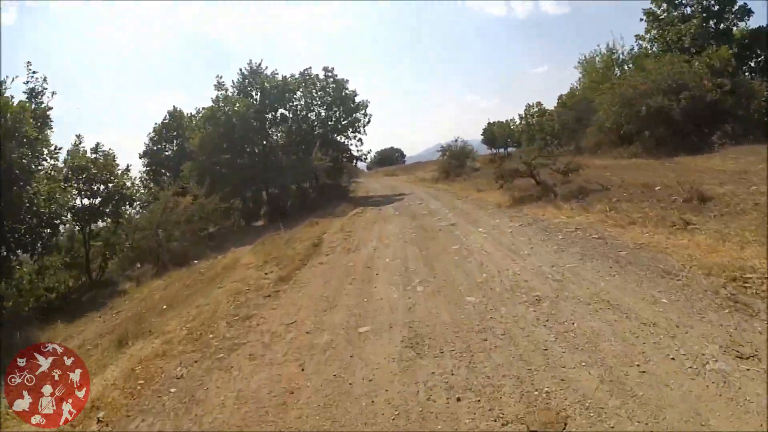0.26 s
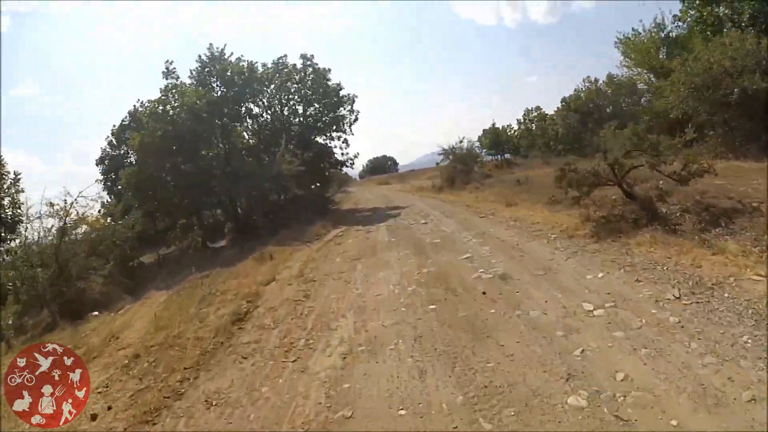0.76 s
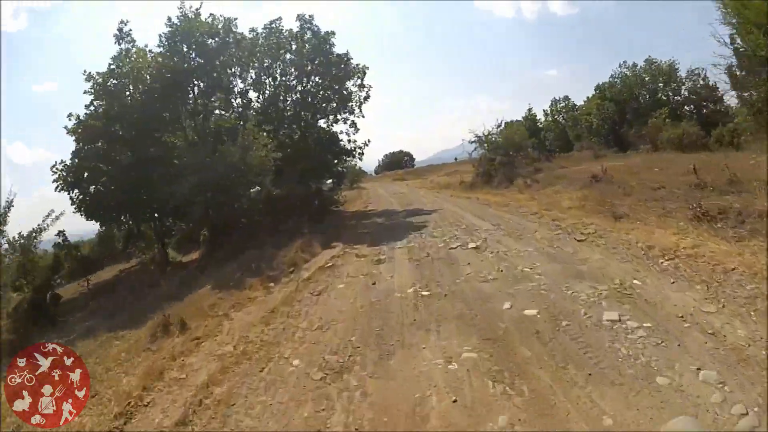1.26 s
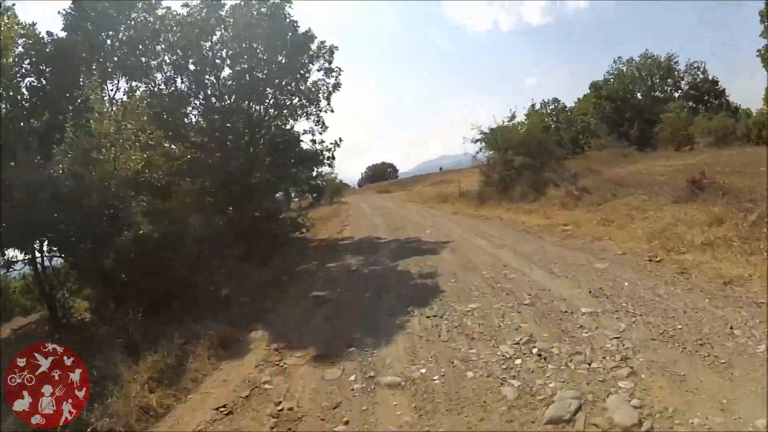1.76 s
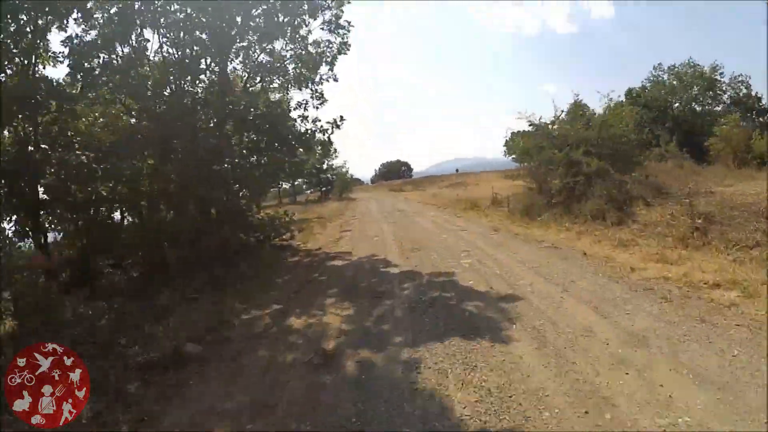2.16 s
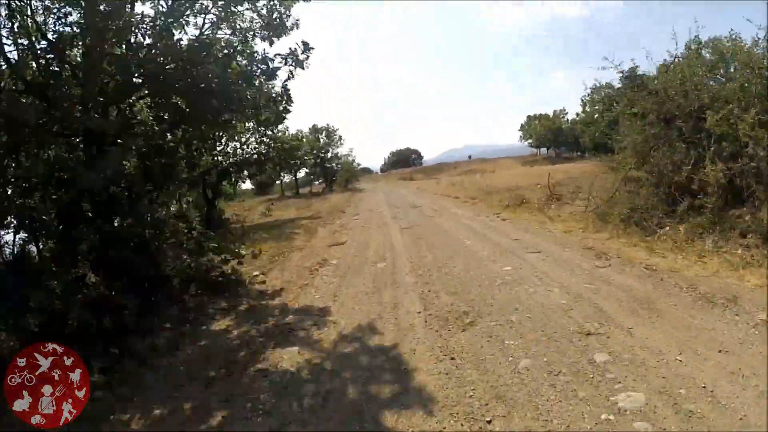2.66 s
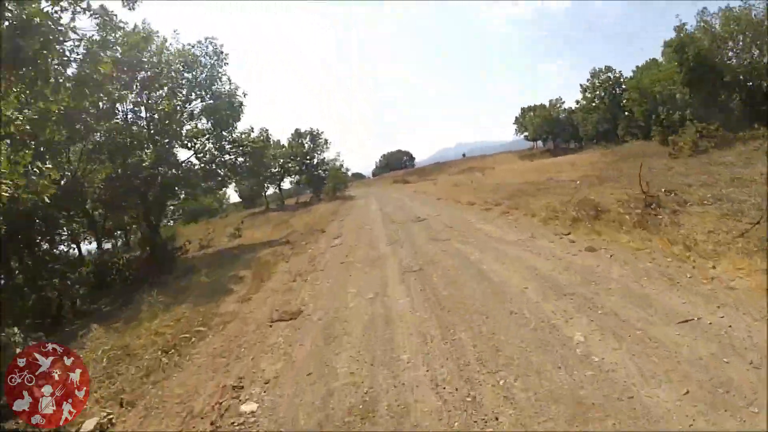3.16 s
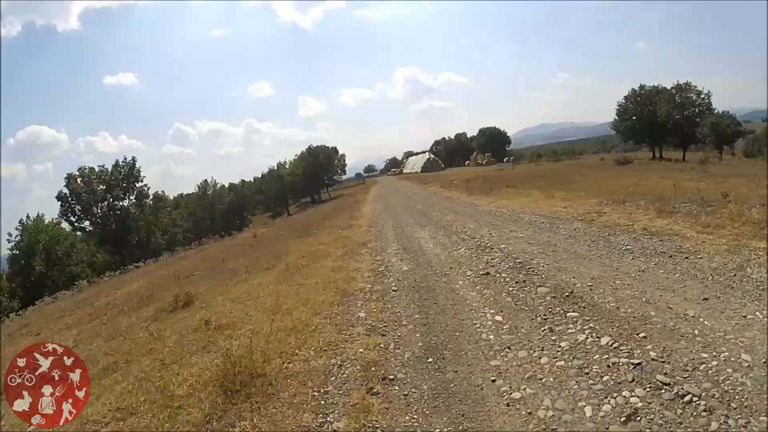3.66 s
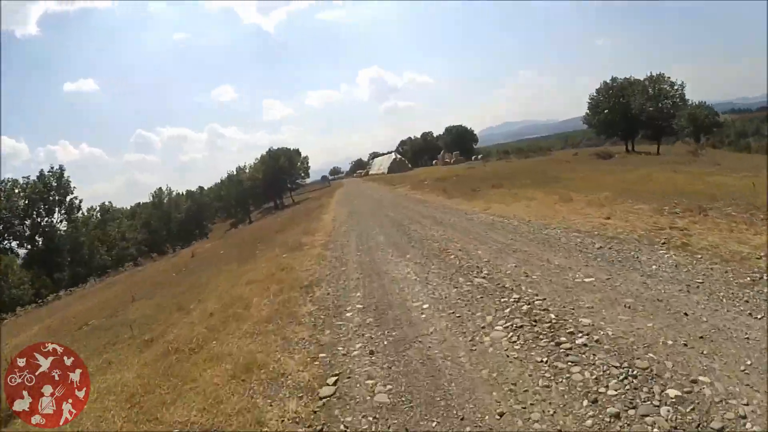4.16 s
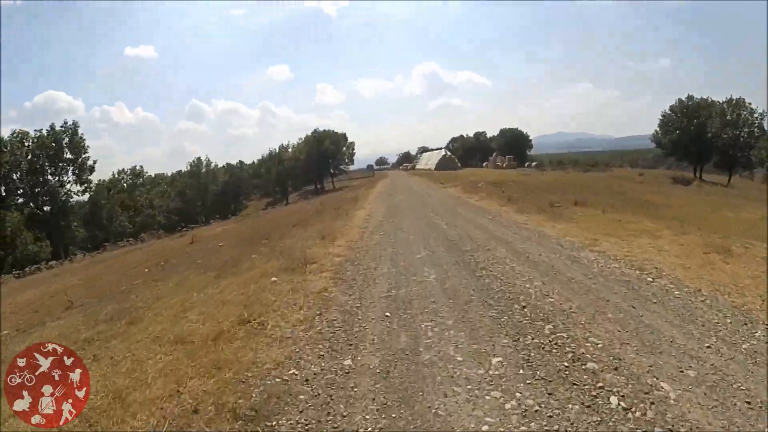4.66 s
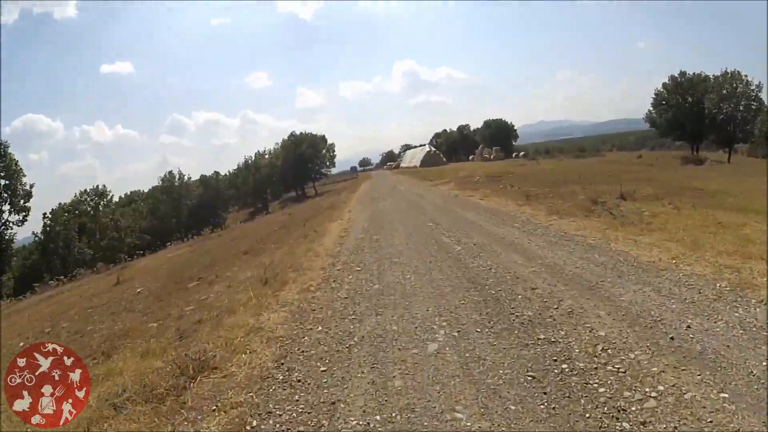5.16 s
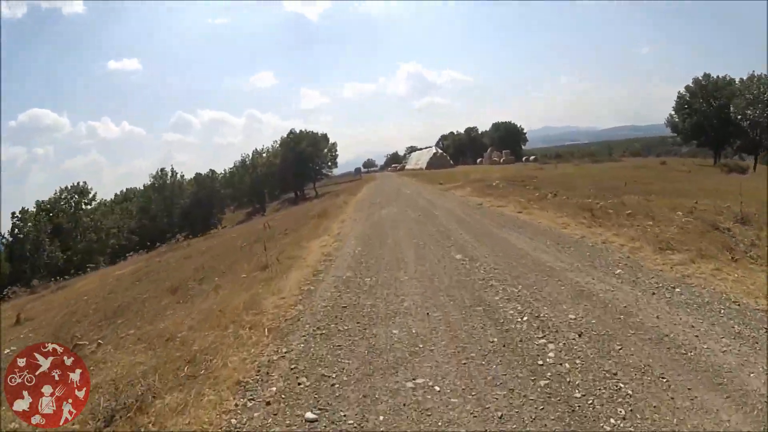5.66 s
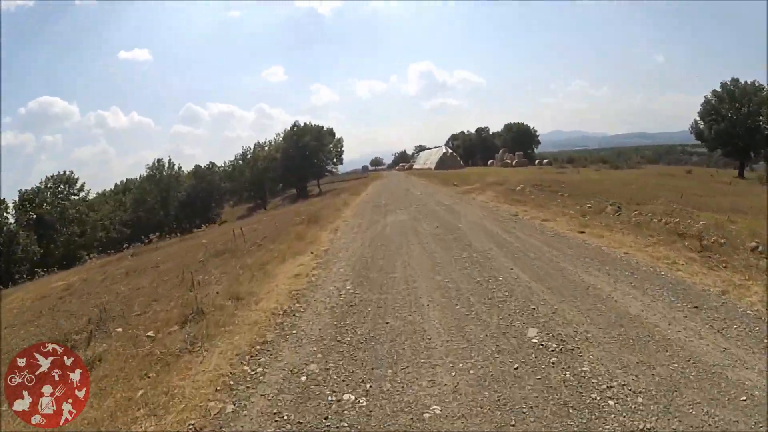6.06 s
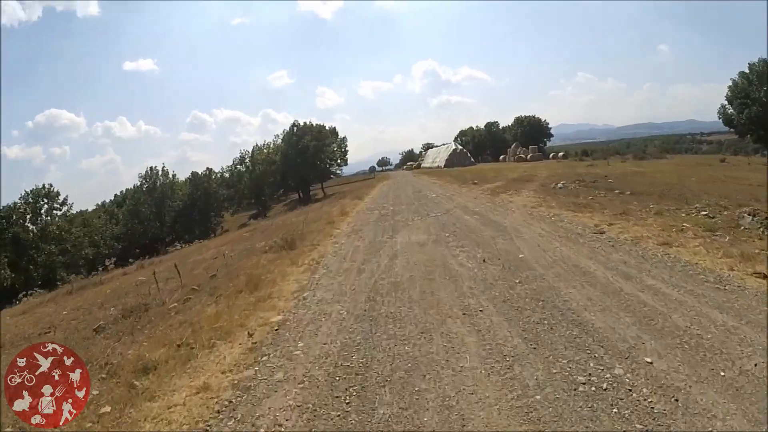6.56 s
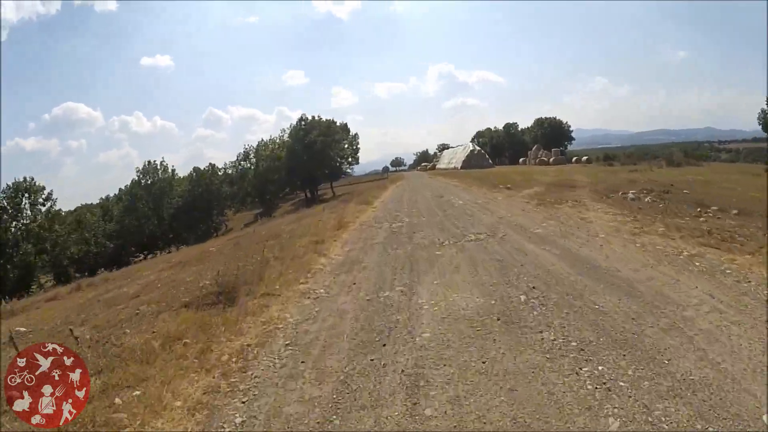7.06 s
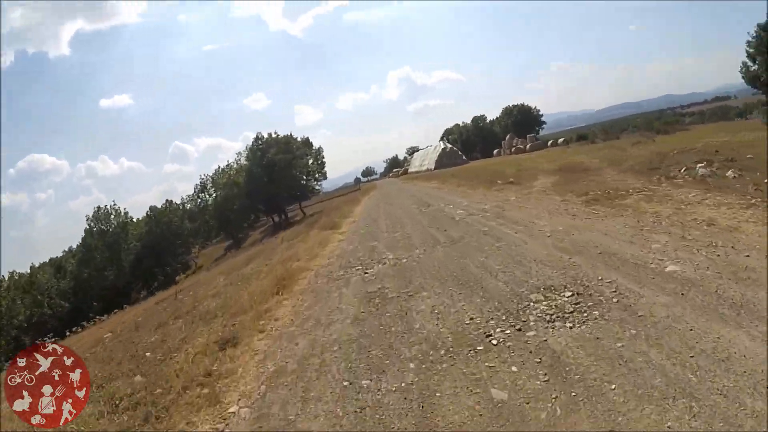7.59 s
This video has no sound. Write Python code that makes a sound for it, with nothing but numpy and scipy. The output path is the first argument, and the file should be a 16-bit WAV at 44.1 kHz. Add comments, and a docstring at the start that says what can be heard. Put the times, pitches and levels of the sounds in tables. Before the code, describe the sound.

Continuous gritty gravel crunch with quick bright ticking, deep wind buffeting, dull bump knocks and thumps, and a few sharp stone strikes.

```python
"""Mountain bike on a gravel road

Heard from a microphone that rides on the bike. Tyres crunch, as many briefly ringing pebbles over grit.
Stones pop as bursts of coloured noise, or strike the bike, whose frame answers with damped modes.
Bumps knock the frame, thump the tyres, sway the mount at its resonance and make a loose part tick.
Wind rumbles and breaks into eddies, both as coloured noise, and the largest swings saturate.
"""
import sys
import numpy as np
from scipy import signal
from scipy.fft import rfft, irfft
from scipy.io import wavfile
from scipy.ndimage import uniform_filter1d

SR = 44100
rng = np.random.default_rng(int(sys.argv[2]) if len(sys.argv) > 2 else 0)


def file_out(sig):
    """Save sig as 16-bit WAV at sys.argv[1]."""
    # one column per channel
    cols = np.atleast_2d(sig).T
    # limit, then scale
    lim = np.clip(cols, -1, 1)
    pcm = np.round(lim * 32767).astype(np.int16)
    wavfile.write(sys.argv[1], SR, pcm)


N = 345303
T = np.arange(N) / SR
RING = T[:2048]  # time axis of one short blow, s


def undb(db):
    """Logarithmic level: decibels to amplitude gain."""
    return np.exp(np.asarray(db) * (np.log(10) / 20))


def unit(x):
    """Normalization: scale to rms 1."""
    return x / np.sqrt(np.mean(x ** 2))


def steady(x, seconds):
    """Automatic level: hold the running rms near 1, keeping the faster flutter."""
    size = int(seconds * SR / 2) + 1
    power = uniform_filter1d(uniform_filter1d(x ** 2, size), size)
    return x / np.sqrt(power + 1e-12)


def walk(rate):
    """Smoothed random steps, rate per second: a wander with a spread near 1."""
    size = int(SR / rate)
    held = np.repeat(rng.standard_normal(N // size + 1), size)
    return unit(uniform_filter1d(held, size)[:N])


def colour(x, spectrum, size=2048):
    """Minimum-phase filtering: a causal response through (Hz, dB) points, found by folding the cepstrum."""
    hz, db = np.transpose(spectrum)
    bins = np.maximum(np.fft.rfftfreq(size, 1 / SR), 1)
    gain_db = np.interp(np.log(bins), np.log(hz), db)
    cepstrum = irfft(np.log(undb(gain_db)))
    cepstrum[1:size // 2] *= 2
    cepstrum[size // 2 + 1:] = 0
    response = irfft(np.exp(rfft(cepstrum)))
    return signal.oaconvolve(x, response)[:len(x)]


def ring(modes, scatter_db, detune=0):
    """Modal decay: a blow excites damped sines, each time weighted and tuned a little differently."""
    luck = rng.standard_normal((len(modes), 2))
    total = 0
    for (hz, width, db), (strength, bend) in zip(modes, luck):
        decay = np.exp(-np.pi * width * RING)
        tone = np.sin(2 * np.pi * hz * (1 + detune * bend) * RING)
        total = total + undb(db + scatter_db * strength) * decay * tone
    return total


def scrape(rise_s, decay_s):
    """Noise burst: noise that swells and dies in milliseconds."""
    swell = 1 - np.exp(-(RING / rise_s) ** 2)
    return rng.standard_normal(len(RING)) * swell * np.exp(-RING / decay_s)


def peak(x, db):
    """Short-time level: scale a blow by the rms of its loudest millisecond, read as a sine's amplitude."""
    return x * undb(db) / np.sqrt(2 * uniform_filter1d(x ** 2, size=44).max())


def add(out, s, x):
    """Superposition: mix a blow in at time s."""
    start = int(np.clip(s * SR, 0, N - 1))
    out[start:start + len(x)] += x[:N - start]


def grains(rate, spread_db):
    """Random impulse train, rate per second: many small impulses, a few large, normalized to rms 1."""
    out = np.zeros(N)
    hits = np.flatnonzero(rng.random(N) < rate / SR)
    size = rng.exponential(size=N)[hits]
    sign = np.sign(rng.random(N)[hits] - .5)
    out[hits] = sign * undb(spread_db * np.minimum(size, 4.5))
    return unit(out)


# level of gravel under the tyres: start_s, level_db [dB]
CRUNCH_LEVEL = [(0, -39.5), (1.35, -36), (1.58, -41.5), (1.8, -36), (2.4, -35), (3.6, -38), (4.1, -35.5),
                (5.9, -33.5), (6.65, -33.5), (7.45, -36), (7.83, -35.5)]
# colour of the gravel: pitch_hz [Hz], relative level_db [dB]
CRUNCH_SPECTRUM = [(200, 10.5), (600, 0.5), (1000, 4.5), (1350, 2.5), (1750, -2), (2400, -1), (3300, -6),
                   (4200, -7), (5200, -15.5), (6500, -22), (10000, -49), (15000, -46)]


def tyres(crunch_db):
    """Granular excitation: pebbles ground under the tread each ring at their own pitch, over fine grit."""
    pebbles = 0
    for hz in np.geomspace(600, 12000, num=14):
        width_hz = 0.19 * hz
        pebble = ring([(hz, width_hz, 0)], 0)
        ringing = unit(signal.oaconvolve(grains(600, 4.5), pebble)[:N])
        pebbles = pebbles + np.sqrt(width_hz) * ringing
    grit = unit(pebbles) + undb(-8.0) * grains(3500, 6.0)
    # stones give way in little clumps
    clumps = undb(2.1 * walk(170) + 1.6 * walk(30))
    return steady(colour(grit * clumps, CRUNCH_SPECTRUM), 0.9) * undb(crunch_db)


# loudest stones popping out from under the tyres: start_s, level_db [peak dB], pitch_hz, fade_ms
POPS = [(0.926, -22.5, 2300, 3), (1.155, -20, 1970, 2.8), (1.746, -20.5, 2050, 7),
        (1.784, -19.5, 2140, 3.6), (1.925, -17.5, 1910, 6), (2.071, -15.5, 1780, 2.7),
        (2.238, -18, 1900, 3.6), (2.259, -19.5, 2400, 2.4), (2.273, -27, 2100, 2.1), (2.3548, -13, 2050, 3),
        (2.676, -14, 1290, 3), (3.1175, -21.5, 2130, 3), (3.319, -16, 1860, 3.3), (3.402, -12, 1070, 1.8),
        (3.843, -20, 1910, 5.2), (3.977, -18.5, 1810, 3.7), (4.19, -24.5, 2000, 8.8),
        (4.461, -18.5, 1940, 3.7), (4.8505, -23, 2170, 6.8), (5.193, -23, 1660, 5), (5.43, -22, 2280, 3.8),
        (5.623, -22, 2200, 4.5), (5.871, -17, 1070, 5.6), (5.986, -29, 2300, 4.5),
        (6.355, -21.5, 1995, 3.5), (6.503, -26, 2000, 3), (6.512, -19.5, 2040, 3), (7.05, -19, 2160, 3.8),
        (7.554, -25, 2000, 3), (7.607, -19.5, 1580, 3.6)]
# colour of a pop: multiple of its pitch [ratio], relative level_db [dB]
POP_BAND = [(.25, -23), (.4, -3), (1, 2.5), (1.3, -0.5), (1.65, -16.5), (6, -45)]


def pops():
    """Band-limited transients: a pinched stone escapes with a short gritty burst."""
    out = np.zeros(N)
    for s, db, hz, fade_ms in POPS:
        band = [(hz * multiple, band_db) for multiple, band_db in POP_BAND]
        burst = scrape(rise_s=0.00049, decay_s=fade_ms / 1000)
        add(out, s, peak(colour(burst, band), db))
    return out


# dull knocks of the frame over bumps, and at 3.075 s a thud as a squall sets in: start_s, level_db [peak dB]
KNOCKS = [(0.055, -20), (0.862, -3.5), (1.451, 1.5), (1.4957, -5), (1.842, -0.5), (1.888, -1), (2.074, -11),
          (2.255, -9), (2.677, -14), (2.886, -6), (2.946, -18), (2.965, -7.5), (3.012, -6), (3.075, -9.5),
          (3.402, -6), (3.4218, -9), (3.444, -3), (3.965, -11), (6.754, -28), (6.813, -16)]
# ring of the frame: pitch_hz, width_hz, relative level_db [dB]
FRAME_MODES = [(373, 88, -2), (590, 65, 1), (780, 74, -3), (920, 105, -0.5), (1160, 67, -11)]
KNOCK_GRIT_DB = -12.5  # stones grinding during a knock, against the knock


def frame_knocks():
    """Struck structure: a short push convolved with the frame's modes rings low, while stones grind."""
    out = np.zeros(N)
    push = RING * np.exp(-RING / 0.00017)
    for s, db in KNOCKS:
        knock = signal.fftconvolve(ring(FRAME_MODES, 3.3, detune=0.03), push)
        grinding = signal.fftconvolve(knock, scrape(.001, .003))
        add(out, s, peak(knock, db))
        add(out, s, peak(grinding, db + KNOCK_GRIT_DB))
    return out


# soft thumps of the tyres over bumps: start_s, level_db [peak dB], pitch_hz
THUMPS = [(2.196, -6, 189), (2.32, -8, 230), (3.102, -10, 210), (3.202, 0.5, 258), (3.251, 6, 240),
          (3.315, -3, 300), (3.388, -11, 280), (6.738, -4, 140), (7.014, -1, 172), (7.146, -11, 170),
          (7.412, -15, 260), (7.583, -4, 200), (7.716, -6, 280)]
THUMP_DAMPING, THUMP_CONTACT_S = 0.56, 0.0009  # resonance width over pitch; time scale of the push


def tyre_thumps():
    """Heavily damped resonance: a soft push makes the tyre thump at one low pitch."""
    out = np.zeros(N)
    soft_push = RING * np.exp(-RING / THUMP_CONTACT_S)
    for s, db, hz in THUMPS:
        resonance = ring([(hz, THUMP_DAMPING * hz, 0)], 0)
        add(out, s, peak(signal.fftconvolve(resonance, soft_push), db))
    return out


# flung stones that strike the bike, and at 3.436 s a broad click: start_s, reference level_db [dB], thud_db
# [dB, relative]
CLACKS = [(3.432, -21.5, -9), (3.436, -17, -4), (3.4561, -10, -11), (5.4907, -4, -1.5), (5.666, -9, -1),
          (5.836, -7.5, 0), (5.9639, -11.5, 1)]
# colour of a flung stone's snap: pitch_hz, relative level_db [dB]
CLACK_SPECTRUM = [(200, -14), (660, 7), (1100, 5.5), (1600, -3), (2000, 1), (3000, -4), (4200, 4),
                  (5600, -2), (6800, -7), (8300, -5.5), (10600, -15), (12400, -14.5), (15000, -19.5)]
SNAP_DB, CLACK_GRIT_DB, CLACK_THUD_DB = 3.5, -4, -2.5  # snap, grit and thud, each against the row's level
CLACK_LEAD_S, CLACK_RISE_S, CLACK_DECAY_S = 0.000983, 0.0013, 0.0024  # lead of the grit; its swell and fade


def flung_stones():
    """Impact and response: an impulsive snap amid a gritty burst, answered by the frame's modes."""
    out = np.zeros(N)
    snap = colour(signal.unit_impulse(len(RING)), CLACK_SPECTRUM)
    for s, db, thud_db in CLACKS:
        grit = colour(scrape(CLACK_RISE_S, CLACK_DECAY_S), CLACK_SPECTRUM)
        add(out, s, peak(snap, db + SNAP_DB))
        add(out, s - CLACK_LEAD_S, peak(grit, db + CLACK_GRIT_DB))
        add(out, s, peak(ring(FRAME_MODES, 2), db + CLACK_THUD_DB + thud_db))
    return out


# hardest ticks of a loose part, jolted by the road, the first a click at the very start: start_s, level_db
# [peak dB]
JOLTS = [(0.007, -20.5), (0.044, -23.5), (0.0948, -20), (0.2505, -24), (0.29, -24), (0.341, -22),
         (0.358, -15.5), (0.399, -24), (0.4495, -17), (0.466, -27), (0.473, -18.5), (0.49, -25),
         (0.5338, -27), (0.5542, -19.5), (0.618, -20.5), (0.6547, -17), (0.6927, -21.5), (0.7673, -21.5),
         (0.8062, -16), (0.831, -14), (0.844, -13.5), (0.8662, -13.5), (0.8939, -22), (0.911, -23),
         (0.9253, -19), (0.942, -24), (0.9685, -22.5), (0.983, -29), (1.0001, -21.0), (1.0152, -15),
         (1.042, -21), (1.06, -22), (1.0768, -17.5), (1.0958, -17.5), (1.1272, -23), (1.1563, -16),
         (1.2105, -29), (1.2247, -19.5), (1.252, -26), (1.278, -20.5), (1.296, -26), (1.3123, -21.5),
         (1.332, -20.5), (1.3625, -21), (1.376, -27), (1.3984, -19), (1.4527, -21.5), (1.4961, -19),
         (1.519, -20), (1.538, -20), (1.575, -19), (1.5966, -13), (1.6208, -27), (1.642, -21),
         (1.6636, -25), (1.6773, -15), (1.7034, -17), (1.7284, -21), (1.777, -21.5), (1.821, -26),
         (1.839, -18), (1.8506, -16), (1.8755, -18.5), (1.894, -31), (1.952, -25), (1.9729, -15),
         (2.024, -15.5), (2.039, -21), (2.147, -21), (2.1901, -19), (2.205, -20), (2.208, -14),
         (2.229, -27), (2.2395, -16), (2.259, -10.5), (2.2962, -17), (2.315, -15), (2.321, -25),
         (2.332, -21), (2.351, -15), (2.395, -22), (2.41, -24), (2.429, -27), (2.467, -20), (2.513, -15.5),
         (2.597, -18), (2.6246, -17.5), (2.656, -25), (2.665, -19), (2.693, -19.5), (2.7546, -23),
         (2.817, -20.5), (2.861, -16), (2.8834, -25), (2.915, -24), (2.962, -18.5), (2.9732, -14),
         (2.9949, -22), (3.081, -20.5), (3.161, -24), (3.185, -21.5), (3.276, -21), (3.3098, -17.5),
         (3.3604, -20.5), (3.377, -16), (3.507, -23), (3.571, -24), (3.588, -25), (3.7192, -19),
         (3.7698, -21.0), (3.817, -17.5), (3.8302, -19.5), (4.0088, -18), (4.0254, -20.5), (4.076, -23.5),
         (4.1454, -20.5), (4.1685, -19), (4.1888, -20.5), (4.3249, -17.5), (4.431, -21), (4.611, -27),
         (4.625, -19), (4.634, -21), (4.6482, -18), (4.8712, -20), (4.9466, -23.5), (5.008, -20.5),
         (5.1193, -26.5), (5.1316, -20.5), (5.2034, -16.5), (5.23, -16), (5.3948, -23.0), (5.4036, -17.5),
         (5.5037, -28), (5.541, -18.5), (5.608, -20), (5.628, -21.5), (5.694, -23), (5.706, -19.5),
         (5.765, -22), (5.7934, -16.5), (5.807, -22), (5.87, -19), (5.886, -18.5), (5.9336, -18),
         (5.9543, -25), (6.012, -17.5), (6.0354, -18), (6.0791, -24), (6.098, -22), (6.117, -18),
         (6.127, -17), (6.1357, -19), (6.1742, -22), (6.1828, -16.5), (6.225, -27), (6.235, -16.5),
         (6.2623, -28), (6.2751, -20.5), (6.3586, -24.5), (6.397, -13.5), (6.4157, -25), (6.436, -16),
         (6.449, -23), (6.482, -23.5), (6.546, -21.5), (6.5703, -21.5), (6.6293, -19.5), (6.6487, -22.5),
         (6.6598, -21), (6.745, -24), (6.789, -21), (6.965, -20.5), (7.005, -22), (7.048, -21.5),
         (7.0937, -20.5), (7.2633, -25.5), (7.27, -25.5), (7.475, -24), (7.6444, -17), (7.662, -13),
         (7.703, -16), (7.7196, -15.5), (7.758, -22.5), (7.7932, -20), (7.803, -21)]
# rough stretches of road that keep the part rattling: start_s, end_s
ROUGH_PATCHES = [(.44, 0.66), (.77, 2.05), (2.15, 2.56), (3.76, 3.9), (3.98, 4.12), (4.93, 5.13),
                 (5.598, 6.8), (6.35, 6.5), (7.63, 11)]
ROUGH_ROAD_DB, SMOOTH_ROAD_DB = -29.5, -38.5  # median peak of a bounce on rough stretches and elsewhere
TICK_GAP_S, TICK_GAP_SPREAD, TICK_SCATTER_DB = 0.017, 0.32, 6  # median gap, its log spread; strength spread
RESEAT_S = .010  # bounces this close to a hard jolt are weak


def bounces():
    """Random renewal process: the part keeps bouncing, harder on rough road, weakly around a jolt."""
    gap_luck, size_luck = rng.standard_normal(size=(420, 2)).T
    times = np.cumsum(TICK_GAP_S * np.exp(TICK_GAP_SPREAD * gap_luck))
    levels = np.full(len(times), SMOOTH_ROAD_DB, float)
    for start, end in ROUGH_PATCHES:
        levels[(times > start) & (times < end)] = ROUGH_ROAD_DB
    for s, _ in JOLTS:
        levels[np.abs(times - s) < RESEAT_S] = SMOOTH_ROAD_DB
    return list(zip(times, levels + TICK_SCATTER_DB * size_luck))


# ring of the loose part: pitch_hz, width_hz, relative level_db [dB]
TICK_MODES = [(3850, 120, -17.5), (4163, 49, -4), (4497, 94, -1), (5350, 240, -7), (6660, 214, -18),
              (7620, 430, -8), (9750, 100, -28), (12200, 460, -22)]
TICK_DETUNE, TICK_COLOUR_DB = 0.0075, 2.5  # spread of its pitches (share) and of its modes' strength


def part_ring(detune=0):
    """Contact damping: pressed back into its seat, the part stops ringing early."""
    choke = np.exp(-(RING / 0.0052) ** 4)
    return ring(TICK_MODES, TICK_COLOUR_DB, detune=detune) * choke


# colour of the noise burst around a tick: pitch_hz, relative level_db [dB]
BURST_SPECTRUM = [(300, -28), (1000, -16), (2500, 3), (3600, 12.5), (5500, 2.5), (6800, -8.5), (7800, -9.5),
                  (10000, -15), (15000, -16)]
# burst against the tick, softer in the second half: start_s, level_db [dB, before scatter]
BURST_LEVEL = [(3.6, -9), (3.8, -10)]
CONTACT_S, CONTACT_SCATTER_DB = .000036, 5.5  # median contact time scale of a light tick; its spread
CONTACT_GROWTH = 0.45  # shortening of the contact, dB per dB of strength
REBOUND_DB = -12  # mean level of the rebound, against the tick
BUZZ_DB = -26.5  # buzz of the part, against the knock that starts it


def rattle():
    """Impact spectrum: shorter contacts sound brighter as a loose part snaps on its seat and rings briefly."""
    out = np.zeros(N)
    burst_response = colour(signal.unit_impulse(128), BURST_SPECTRUM)
    for s, db in list(JOLTS) + bounces():
        # a gentle landing has a longer contact and sounds duller
        strength_db = max(db, ROUGH_ROAD_DB) - ROUGH_ROAD_DB
        contact_db = CONTACT_SCATTER_DB * rng.standard_normal() - CONTACT_GROWTH * strength_db
        contact_s = CONTACT_S * undb(contact_db)
        push = (RING * np.exp(-RING / contact_s))[:64]
        tick = np.convolve(part_ring(TICK_DETUNE), push)
        add(out, s, peak(tick, db))
        # a short burst of coloured noise softens the attack, starting just before the tick
        burst_db = np.interp(s, *np.transpose(BURST_LEVEL)) + 3 * rng.standard_normal()
        burst = np.convolve(scrape(rise_s=0.0008, decay_s=0.0035), burst_response)
        add(out, s - .0009, peak(burst, db + burst_db))
        # a weak rebound follows within milliseconds
        rebound_db = REBOUND_DB + 4 * rng.standard_normal()
        add(out, s + rng.uniform(.002, .008), peak(tick, db + rebound_db))
    # a knock of the frame sets the part buzzing
    for s, db in KNOCKS:
        buzz = signal.fftconvolve(scrape(0.00087, 0.011), part_ring())
        add(out, s, peak(buzz, db + BUZZ_DB))
    return out


# bumps that set the mount swaying, and at 3.455 s a deep blow of wind: start_s [centre of the swell], reference
# level_db [dB]
SWAYS = [(0.13, -12), (0.67, -9.5), (1.05, -20), (1.28, -10.5), (1.5, -8), (1.72, -19), (1.89, -19),
         (2.049, -5.5), (2.399, -12), (2.52, -8), (2.82, -8), (2.99, -12), (3.14, -20), (3.33, -10),
         (3.455, -6.5), (3.56, -15.5), (3.8, -10), (4.19, -10.5), (4.34, -18), (4.5, -15), (4.7, -17.5),
         (4.96, -9), (5.09, -17), (5.36, -13), (5.82, -12), (5.98, -13.5), (6.14, -19), (6.27, -5.5),
         (6.94, -12.5), (7.13, -11.5), (7.6, -12), (7.81, -29)]
MOUNT_HZ, MOUNT_WIDTH_HZ = 61.63, 9  # resonance of the mount
MOUNT_DB, MOUNT_GROWTH = -19.5, 0.8  # sway on average gravel; its dB per dB of gravel
SWAY_S, SWAY_DB = 0.029, -2  # half length of one swell; its level against the row's


def mount(crunch_db):
    """Driven resonance: the road shakes the mount at its low pitch; bumps swell it for a few cycles."""
    resonance = signal.iirpeak(MOUNT_HZ, MOUNT_HZ / MOUNT_WIDTH_HZ, fs=SR)
    sway = signal.lfilter(*resonance, rng.standard_normal(N))
    sway = signal.sosfilt(signal.butter(4, 1.32 * MOUNT_HZ, fs=SR, output="sos"), sway)
    power = undb(MOUNT_DB + MOUNT_GROWTH * (crunch_db - crunch_db.mean())) ** 2
    for s, db in SWAYS:
        power = power + undb(db + SWAY_DB) ** 2 * np.exp(-((T - s) / SWAY_S) ** 2)
    return steady(sway, 0.072) * np.sqrt(power)


def click():
    """Exponential decay: one thin click, a sudden step that decays within milliseconds."""
    out = np.zeros(N)
    add(out, 3.7065, -undb(-9) * np.exp(-RING / 0.0029))
    return out


# colour of fine sand: pitch_hz, relative level_db [dB]
DUST_SPECTRUM = [(1000, -9), (4500, -16), (6500, 1.5), (8000, -1), (10000, -4.5), (15000, -13)]


def dust(crunch_db):
    """Filtered noise: fine sand and air hiss smoothly, following the rolling tyres."""
    level_db = -61.5 + 0.51 * (crunch_db - crunch_db.mean()) + 3.4 * walk(25)
    return unit(colour(rng.standard_normal(N), DUST_SPECTRUM)) * undb(level_db)


SURGE_ATTACK_SHARE, SURGE_RELEASE_S = 0.14, 0.024  # share of a gust's length spent rising; its fade


def surge(start, length):
    """Amplitude envelope: a gust rises, more slowly if long, holds and quickly releases."""
    rise = np.clip((T - start) / (SURGE_ATTACK_SHARE * length), 0, 1)
    return rise * np.exp(-np.maximum(T - start - length, 0) / SURGE_RELEASE_S)


# gusts that break into eddies on the microphone:
# start_s, length_s, large-eddy level_db [dB], small-eddy level_db [dB]
SURGES = [(0.045, 0.011, -13.5, -21), (0.245, 0.065, -22, -26.5), (0.512, 0.083, -36, -24.5),
          (0.805, 0.079, -18.5, -25.5), (1.432, 0.073, -33, -25), (1.552, 0.031, -23, -28),
          (1.725, 0.14, -20, -29), (2.034, 0.4, -18.5, -30), (2.773, 0.34, -18.5, -29),
          (2.927, 0.02, -20, -14), (3.04, 0.19, -17, -20.5), (3.201, 0.24, -14.5, -20),
          (3.29, 0.045, -13, -15), (3.528, 0.21, -44, -34), (3.835, 0.012, -39, -31),
          (3.97, 0.03, -34, -23.5), (4.18, 0.016, -43, -31), (4.02, 0.32, -37, -32),
          (6.534, 0.24, -17.5, -29.5), (6.657, 0.39, -18.5, -39), (6.73, 0.08, -17.5, -31),
          (6.975, 0.22, -15, -28.5), (7.394, 0.036, -15.5, -23), (7.52, 0.51, -20.5, -42),
          (7.566, 0.022, -20, -28), (7.703, 0.019, -31, -18.5)]
BUFFET_DB, SQUALL_DB = -25.5, -31.5  # large and small eddies in the average wind
EDDY_GROWTH = 0.65  # dB of eddies per dB of wind


def eddy_gains(rumble_db):
    """Power addition: eddies grow with the headwind, and each gust adds its own power."""
    growth_db = EDDY_GROWTH * (rumble_db - rumble_db.mean())
    power = undb(np.array([[BUFFET_DB], [SQUALL_DB]]) + growth_db) ** 2
    for start, length, large_db, small_db in SURGES:
        power = power + (undb([[large_db], [small_db]]) * surge(start, length)) ** 2
    return np.sqrt(power)


# headwind on the microphone: start_s, rumble level_db [dB, before random swelling]
HEADWIND = [(0, -15.5), (.5, -10), (.73, -17.5), (.86, -5.5), (1.12, -11.5), (2.27, -6.5), (2.7, -15),
            (2.86, -7), (4.15, -14), (4.42, -17.5), (4.79, -24.5), (5.0, -15.5), (5.38, -16), (5.8, -9.5),
            (6.3, -13.5), (6.5, -19), (7.15, -12.5), (7.42, -18), (7.83, -7)]
# colours of slow pressure swings, large eddies and small eddies: pitch_hz, relative level_db [dB]
RUMBLE_SPECTRUM = [(5, -13), (16, 0.5), (27, 0.5), (47, -5.5), (68, -8.5), (90, -20), (140, -24.5),
                   (400, -61.5), (3000, -125)]
BUFFET_SPECTRUM = [(50, -18.5), (110, 1), (160, -1.5), (240, -4.5), (330, -9), (480, -22), (1000, -44),
                   (2000, -58.5), (8000, -74.5)]
SQUALL_SPECTRUM = [(150, -11.5), (230, -2.5), (310, 2), (410, -0.5), (560, -7), (720, -13.5), (1500, -35.5),
                   (8000, -76.5)]
SWELL_DB = 1.26  # random swelling of the rumble


def wind(rumble_db):
    """Turbulence noise: slow pressure swings rumble; eddies slap the microphone above them."""
    rumble = steady(colour(rng.standard_normal(N), RUMBLE_SPECTRUM, size=32768), 0.094)
    eddies = rng.standard_normal(N) * undb(2.98 * walk(130) + 2.0 * walk(35))
    buffet = steady(colour(eddies, BUFFET_SPECTRUM, size=8192), 0.093)
    squall = steady(colour(eddies, SQUALL_SPECTRUM), 0.076)
    buffet_gain, squall_gain = eddy_gains(rumble_db)
    rumble_gain = undb(rumble_db + SWELL_DB * walk(6.1))
    return rumble * rumble_gain + buffet * buffet_gain + squall * squall_gain


def scene():
    """Linear superposition: road, bike and wind add, with no reflections."""
    rumble_db = np.interp(T, *np.transpose(HEADWIND))
    crunch_db = np.interp(T, *np.transpose(CRUNCH_LEVEL))
    road = tyres(crunch_db) + pops() + flung_stones() + dust(crunch_db)
    bike = frame_knocks() + tyre_thumps() + rattle() + mount(crunch_db)
    return (road + bike + click() + wind(rumble_db))[None]


OVERLOAD = 0.94  # largest swing that the microphone passes
TOP_HZ = 15400  # upper edge of the passband


def record(dry):
    """Saturation and band limiting: the largest swings flatten, then a steep low-pass cuts the top."""
    rounded = dry / (1 + (dry / OVERLOAD) ** 16) ** (1 / 16)
    low_pass = signal.ellip(8, .2, 70, TOP_HZ, fs=SR, output="sos")
    return signal.sosfilt(low_pass, rounded)


dry = scene()
out = record(dry)
file_out(out)
```